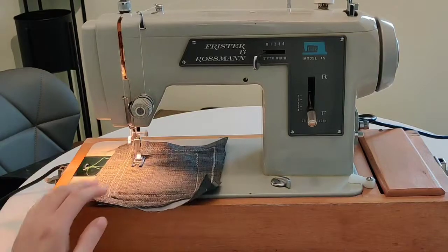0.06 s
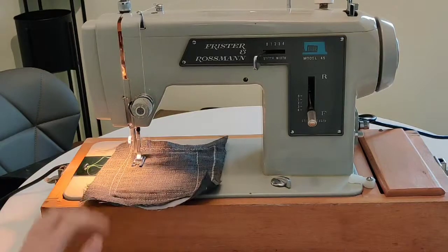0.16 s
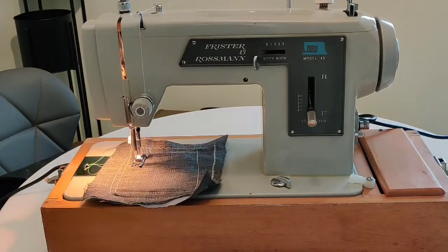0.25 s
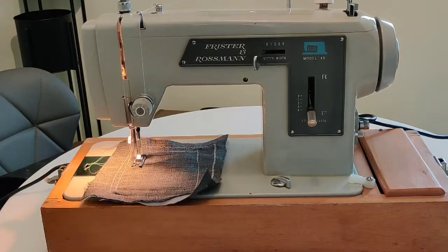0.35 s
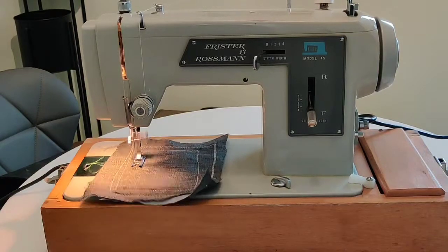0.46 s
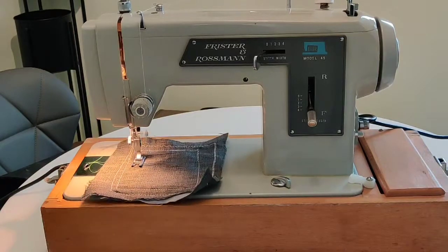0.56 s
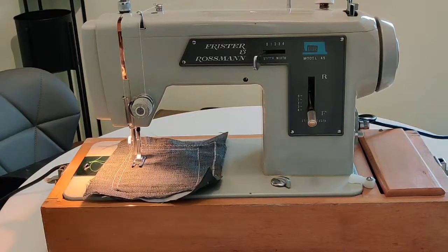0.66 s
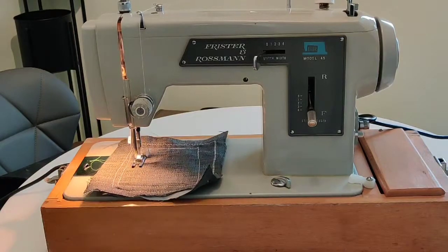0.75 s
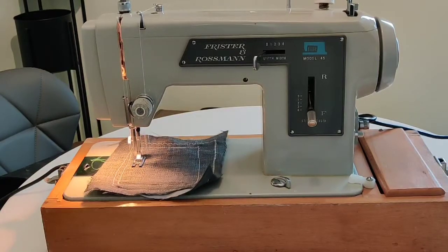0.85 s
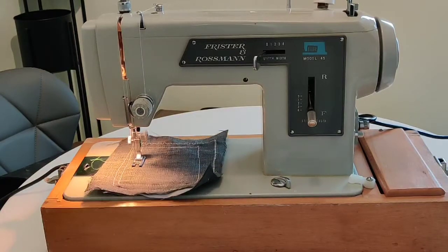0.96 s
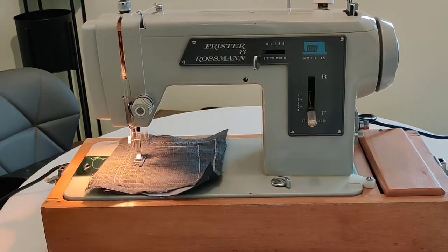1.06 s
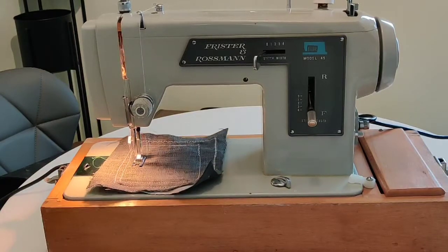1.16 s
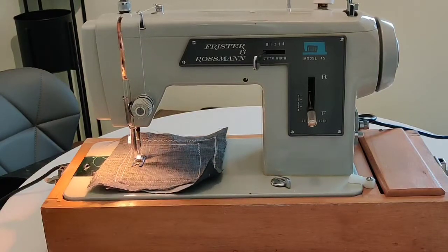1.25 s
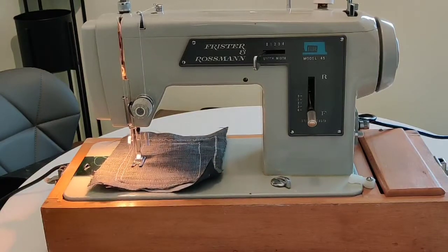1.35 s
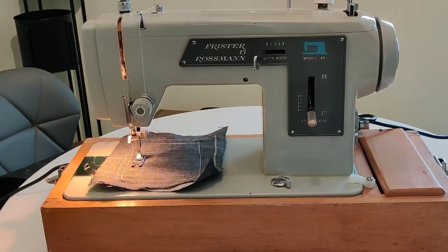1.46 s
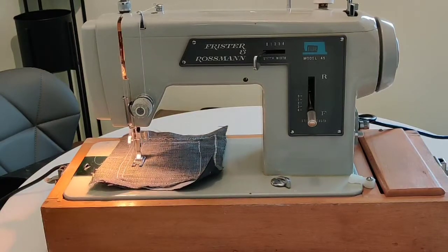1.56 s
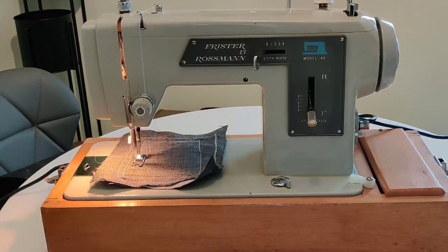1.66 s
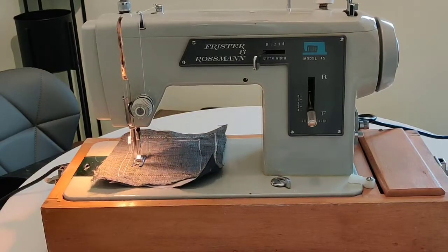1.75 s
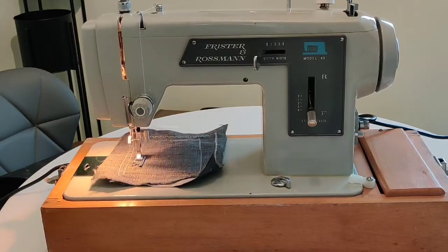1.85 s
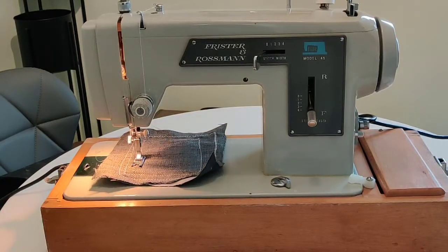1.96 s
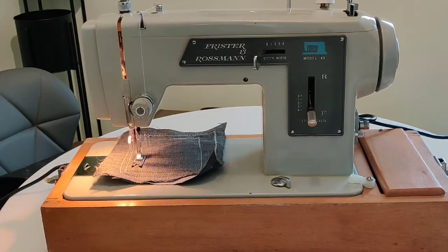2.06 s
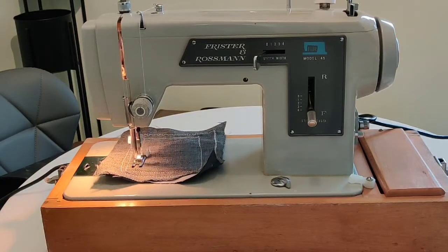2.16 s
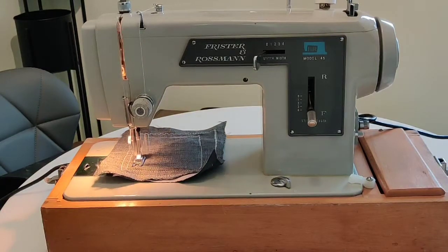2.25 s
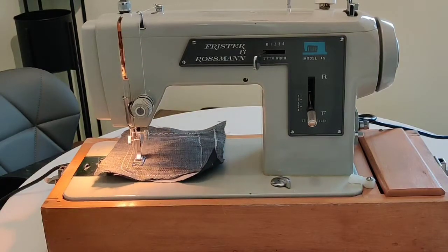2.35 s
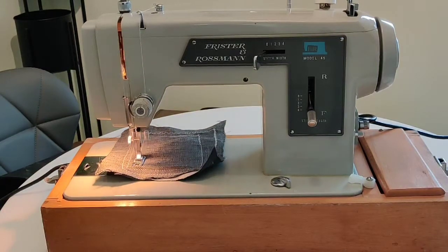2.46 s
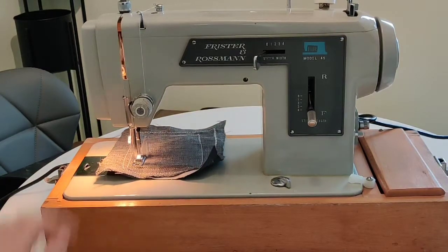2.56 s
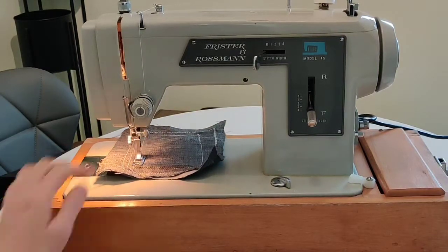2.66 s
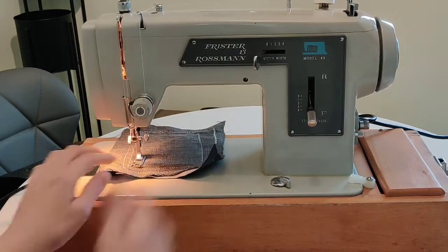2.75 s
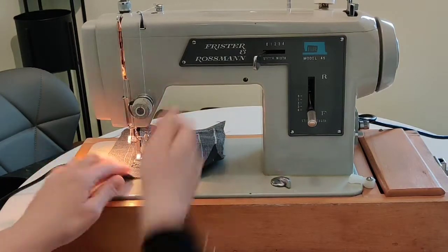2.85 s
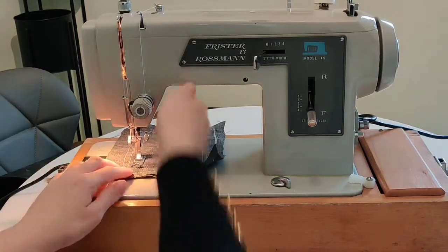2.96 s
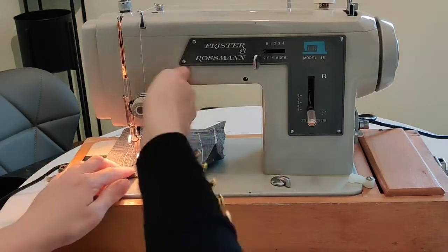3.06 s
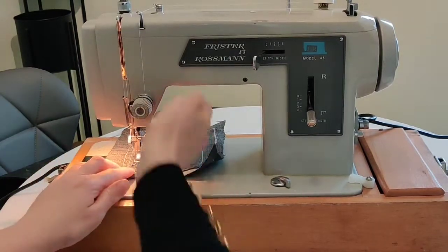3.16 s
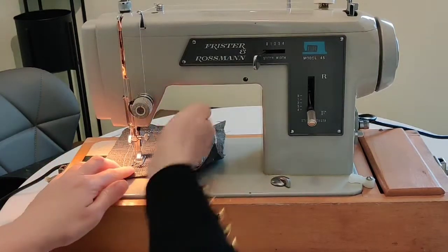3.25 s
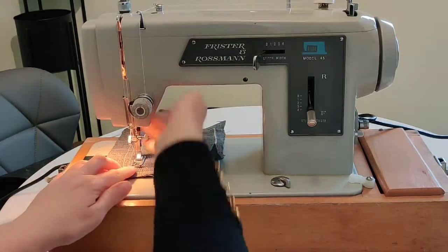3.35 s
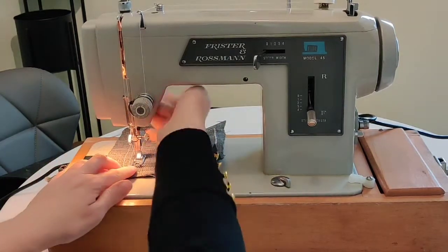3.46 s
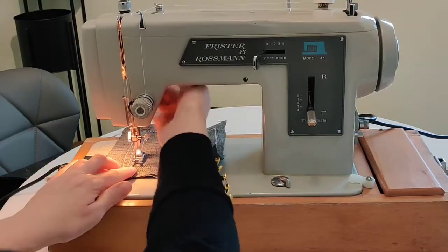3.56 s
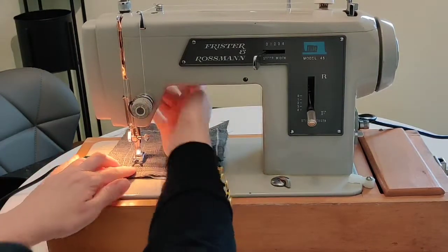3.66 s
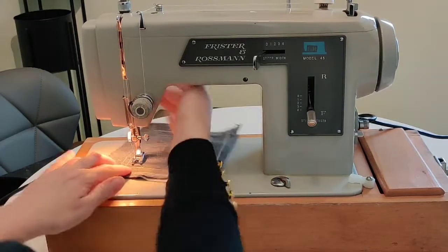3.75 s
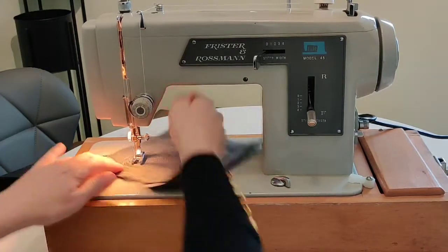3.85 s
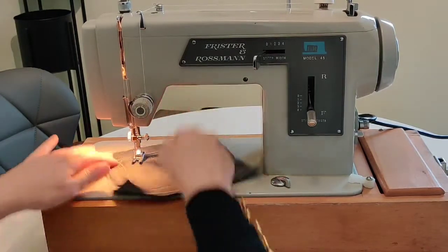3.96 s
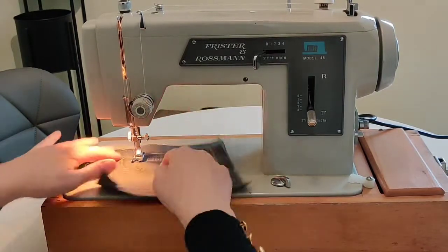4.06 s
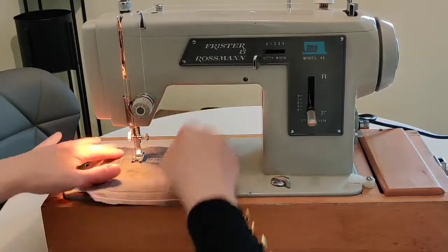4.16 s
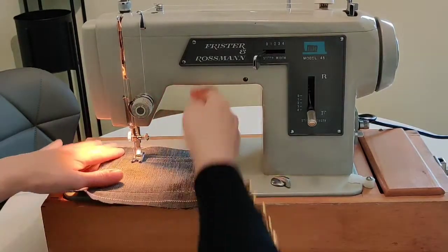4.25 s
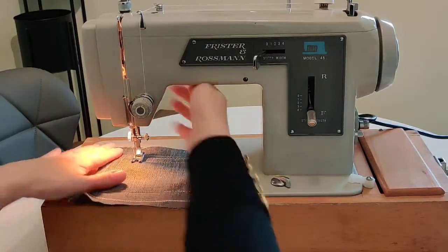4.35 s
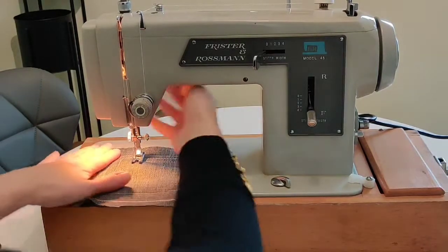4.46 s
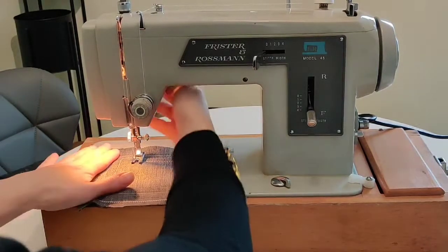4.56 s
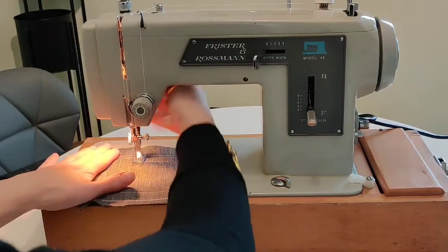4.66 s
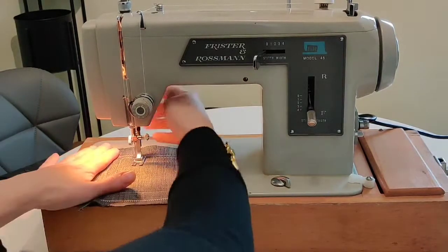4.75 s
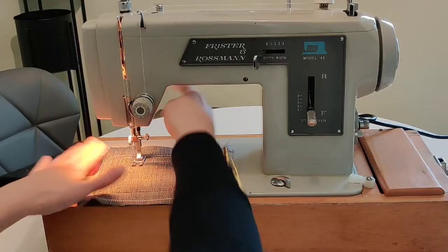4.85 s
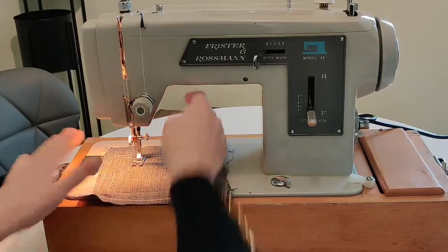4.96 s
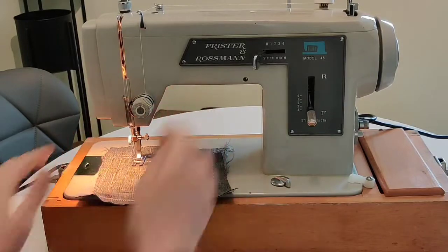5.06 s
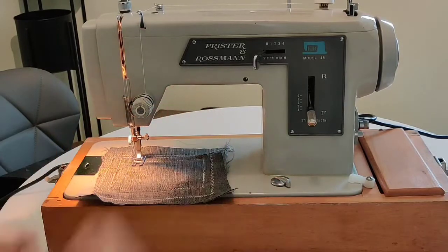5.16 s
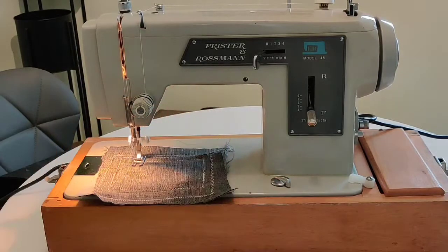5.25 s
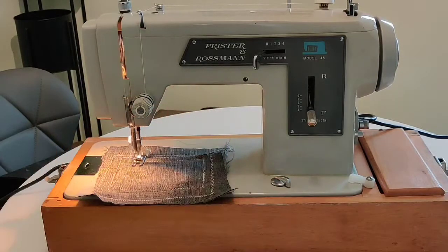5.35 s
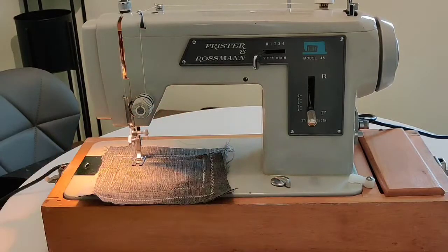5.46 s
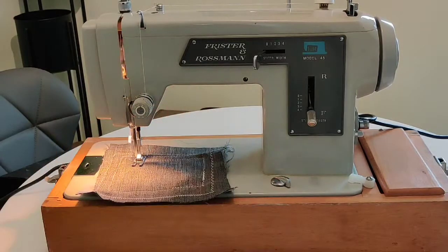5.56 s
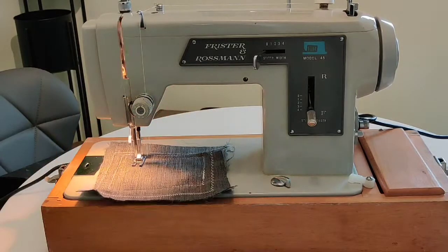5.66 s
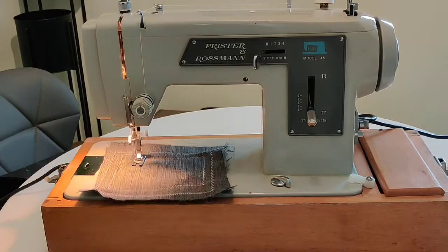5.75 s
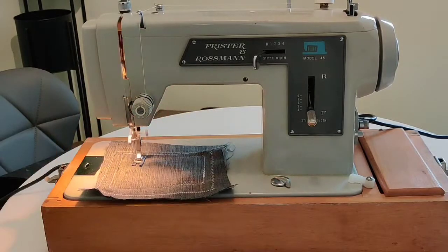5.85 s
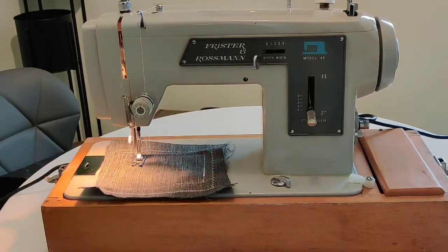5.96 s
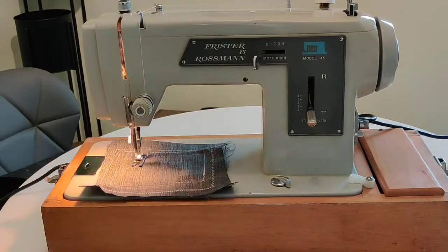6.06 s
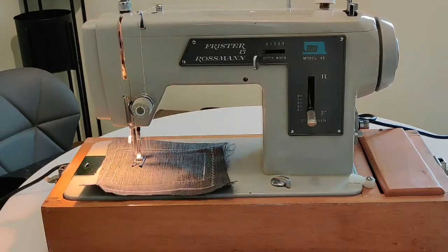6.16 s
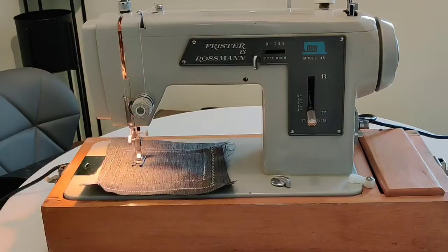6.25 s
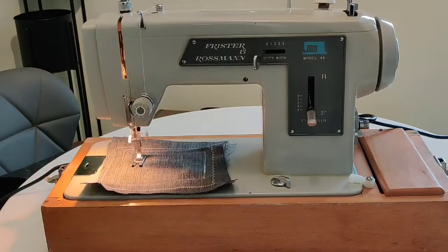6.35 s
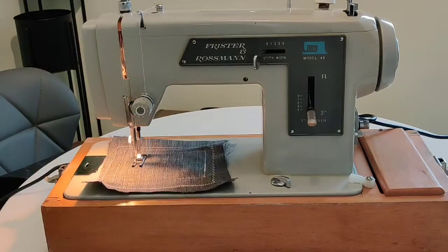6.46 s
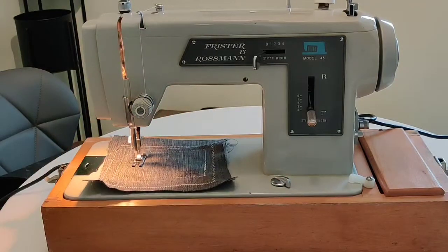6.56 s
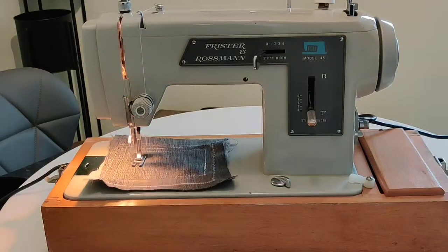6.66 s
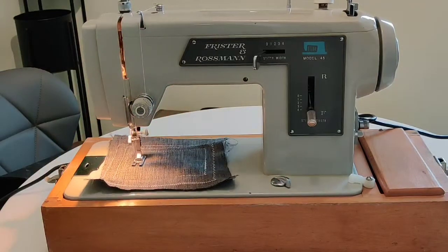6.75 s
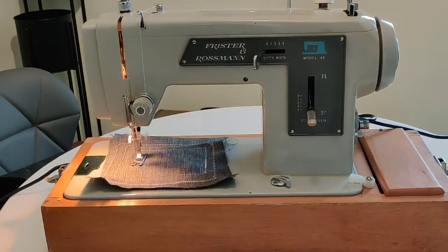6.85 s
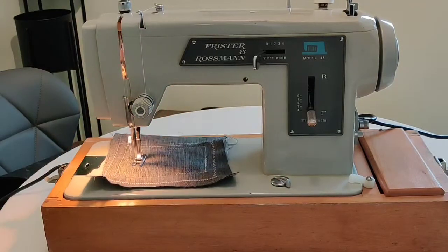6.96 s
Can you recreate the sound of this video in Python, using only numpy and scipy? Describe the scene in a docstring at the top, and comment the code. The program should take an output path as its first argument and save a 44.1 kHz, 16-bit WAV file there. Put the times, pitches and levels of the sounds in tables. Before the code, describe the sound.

An electric sewing machine stitches thick cloth, pauses for metal clacks and fabric handling, then starts up again in a small room.

```python
"""An electric sewing machine on a wooden case stitches thick cloth, eight stitches a second.
Each stitch is a needle knock and a feed rattle over gear clatter and motor hiss. The pedal squeaks
and the machine stops; the presser foot clacks up, hands turn the cloth, the foot is set down,
and the machine gathers speed again. A small room adds a short echo."""
import sys
import numpy as np
from scipy import signal
from scipy.fft import rfft, irfft
from scipy.io import wavfile

SR = 44100
rng = np.random.default_rng(int(sys.argv[2]) if len(sys.argv) > 2 else 0)


def file_out(sig):
    """Save sig as 16-bit WAV at sys.argv[1]."""
    # one column per channel
    cols = np.atleast_2d(sig).T
    # limit, then scale
    lim = np.clip(cols, -1, 1)
    pcm = np.round(lim * 32767).astype(np.int16)
    wavfile.write(sys.argv[1], SR, pcm)


N = 309121
TIME = np.arange(N) / SR
FREQS = np.fft.rfftfreq(N, 1 / SR)
TAIL = TIME[:SR // 2]  # time axis for one hit dying away


# Notes of the bed and wooden case: f/Hz, t60/s (time to fade 60 dB), needle level/dB, feed level/dB
CASE_MODES = [(128.4, 0.17, -18, -34), (182.1, 0.13, -12, -19), (316.7, 0.22, -15, -20.5),
              (350, 0.086, 6, -18), (399, 0.1, -18, -4.5), (458.2, 0.12, 3, 4.5), (475.9, 0.19, -9, -5.5),
              (591, 0.45, -29, -20), (677.6, 0.21, -21, -27), (806, 0.25, -36, -20.5),
              (924, 0.13, -7.5, -13), (1029, 0.042, 0.5, -1.5), (1520, 0.031, 5, -22.5)]
# Tone of the needle's knock: f/Hz, level/dB
KNOCK_TONE = [(100, -58.5), (300, -5), (700, 8), (1300, 8.5), (1900, 2.5), (3000, 0.5), (6000, -45),
              (15000, -55.5)]
# Tone of a bright metal tick, also used by the clacks: f/Hz, level/dB
TICK_TONE = [(1500, -6), (3000, -7.5), (4000, -3), (4900, 10), (5900, -4), (6800, -3.5), (9000, -11),
             (12000, -15.5), (15500, -21)]

def needle(base_db=-29, boom_growth=.6, rattle_s=.0022, rebound_s=.014, crunch_s=.0066):
    """The needle ticks and crunches into the cloth, its bar knocks and slaps back, the case booms."""
    at, accent_db = strokes(0, spread_db=.82, power=.91)
    db = base_db + accent_db
    boom_db = db + 2 + boom_growth * accent_db  # hard blows boom far more than soft ones
    case = ring([(hz, t60, level) for hz, t60, level, _ in CASE_MODES], attack_s=.013)
    boom = through(taps(at - .00259, undb(boom_db)), case)
    knock = crack(KNOCK_TONE)
    slap = sum(strike(t, level, knock, rattle_s) + strike(t + rebound_s, level - 5, knock, rattle_s)
               for t, level in zip(at, db))
    bell_curve = np.exp(-((TAIL - TAIL.mean()) / crunch_s) ** 2)
    piercing = signal.fftconvolve(taps(at + .0026, undb(db)), bell_curve, mode="same")
    crunch = piercing * noise(slope(KNOCK_TONE, FREQS))
    tick = through(taps(at, undb(db - 18.5)), crack(TICK_TONE))
    return tick + undb(-10) * crunch + undb(-8.5) * slap + boom


def feed(base_db=-26.5, scatter_s=.002042):
    """The toothed bar that moves the cloth rattles the case three times a stitch, never twice alike."""
    force = 0
    for part, part_db in [(.435, 0), (.63, -6.5), (.77, -13)]:  # it drops, slides back, lifts
        at, db = strokes(part, spread_db=1.8, power=1.65)
        late = scatter_s * rng.standard_normal(size=64)[:len(at)]
        force = force + chatter(at + late, base_db + part_db + db, length_s=.016, loose=.3)
    return through(force, ring([(hz, t60, db) for hz, t60, _, db in CASE_MODES], attack_s=.0032))


def shuttle(thud_db=-45, hz=188, t60=.19):
    """The shuttle, which carries the lower thread, thuds softly as it reverses twice a stitch."""
    force = 0
    for part in (.26, .62):
        at, db = strokes(part, spread_db=1.8, power=.5)
        force = force + taps(at, undb(thud_db + db))
    return through(force, ring([(hz, t60, 0), (CASE_MODES[3][0], t60, -8)], attack_s=.012))


# Runs of sewing: motor on t/s, first stitch t/s, motor off t/s, top stitch rate f/Hz
RUNS = [(-1, 0.041, 2.72, 8.079), (5.49, 5.602, 7.5, 8.025)]

def strokes(part, spread_db, power, stick_s=.086, spin_up_s=.121, sag_hz_per_s=.07, coast_s=.565):
    """Times and relative levels of a blow that comes once a turn, `part` of a turn after the needle."""
    times = []
    for on, first, off, top_hz in RUNS:
        # the shaft sticks, spins up, slows a little under load and coasts to a stop
        age = np.maximum(TIME - on - stick_s, 0)
        coast = 1 - np.clip((TIME - off) / coast_s, 0, 1) ** 2
        speed = (top_hz - sag_hz_per_s * age) * (1 - np.exp(-age / spin_up_s)) * coast
        turns = np.cumsum(speed) / SR
        turns = turns - np.interp(first, TIME, turns) - part
        times.extend(TIME[1:][np.diff(np.floor(turns)) > 0])
    at = np.array(times)
    effort_db = 20 * np.log10(np.interp(at, TIME, effort()) + 1e-6)
    luck = rng.standard_normal(size=64)[:len(at)]
    return at, power * effort_db + spread_db * luck


def effort(start_db=-14.5, swell_s=.64, release_s=.16):
    """How hard the motor works, 0 to 1: it swells, holds, and fades once the power is cut."""
    out = 0
    for on, _, off, _ in RUNS:
        attack = undb(start_db * np.clip(1 - (TIME - on) / swell_s, 0, 1)) * (TIME > on)
        out = out + attack * np.exp(-(np.maximum(TIME - off, 0) / release_s) ** 2)
    return out


# Tone of a gear click: f/Hz, level/dB
GEAR_TONE = [(25, -4.5), (85, -20.5), (130, 3), (200, 2), (250, 0), (480, 13.5), (700, -4), (1050, 0),
             (1900, -2.5), (2800, -0.5), (3400, -0.5), (4100, -11.5), (6000, -14.5), (7300, -14),
             (11000, -24), (15500, -34)]
# Whining notes of the motor: f/Hz, half-width/Hz, level/dB
MOTOR_WHINE = [(921, 20, -56), (1082, 18, -57.5), (1516, 19, -57.5), (1560, 63, -53.5), (1787, 32, -56),
               (2175, 22, -58.5), (2449, 16, -57.5), (3030, 9, -55.5)]
# Hum of the wooden case at full load: f/Hz, half-width/Hz, level/dB
CASE_HUM = [(33, 14, -63.5), (62.2, 4.4, -66), (451, 10, -51)]

def drive(clicks_per_s=1100, spread_db=4, gears_db=-40):
    """Gears click densely and the motor whines; the case hums as the load gets full."""
    clicks = (rng.random(N) < clicks_per_s / SR) * rng.standard_normal(N)
    clicks *= undb(spread_db * rng.uniform(-.051, 1, N))
    gears = undb(gears_db) * unit(through(clicks, crack(GEAR_TONE)))
    whine, hum = (sum(undb(db) * noise(peak(hz, width)) for hz, width, db in table)
                  for table in (MOTOR_WHINE, CASE_HUM))
    load = effort()
    return load * gears + load ** .87 * whine + load ** 1.8 * hum


# Tone of the motor's brushes, its sliding contacts: f/Hz, level/dB
BRUSH_TONE = [(150, -29.5), (1200, -6.5), (3100, -10.5), (4200, -21.5), (4750, -13.5), (5030, -3.5),
              (5350, -14.5), (5900, -20), (9000, -27.5)]

def brushes(motor_hz=78.55, hiss_db=-46.5, drift_db=2.2, lean_db=4):
    """The brushes sizzle, swelling once a motor turn; each side gets its own hiss, the left louder."""
    angle = 2 * np.pi * motor_hz * TIME + .62 * noise(peak(0, .76))
    flicker_db = noise(peak(31, 36)) + drift_db * noise(peak(4.83, .11))
    bursts = unit(np.exp(.14 * np.cos(angle))) * undb(flicker_db)
    level = undb(hiss_db) * effort() ** 1.44 * bursts
    sides = [room(level * noise(slope(BRUSH_TONE, FREQS)), wet_db=-12, bass_wet_db=-9.5)[ear]
             for ear in range(2)]
    return np.array(sides) * undb([[lean_db], [-lean_db]])


# Tone of a sharp steel click, also used by the snaps: f/Hz, level/dB
STEEL_TONE = [(1000, 7), (3000, 14), (6500, 11.5), (9000, 5.5), (13000, -2.5), (15500, 0)]

def joints(ticks_per_s=110, tick_db=-61, spread_db=3):
    """Slightly loose steel joints add a fine, bright ticking."""
    ticks = (rng.random(N) < ticks_per_s / SR) * undb(tick_db + spread_db * rng.uniform(-1.2, 1, N))
    return through(ticks * effort(), crack(STEEL_TONE))


# Clacks of steel on the iron head: t/s, level/dB, treble level/dB, wood f/Hz, boosted head f/Hz
STEEL_CLACKS = [(2.962, -60, 4.5, 455, 1500), (3.222, -61, -7, 455, 1800), (3.24, -62, -8, 460, 1800),
                (3.254, -46, -30, 523, 900), (3.336, -52, -17, 455, 1500), (3.483, -60, -18, 455, 910),
                (3.707, -30.5, -11, 550, 1300), (3.8162, -30.5, -11.5, 456, 1800),
                (3.9232, -34, -16, 450, 910), (4.306, -59, -24, 445, 1200), (4.727, -57, -14.5, 455, 900),
                (4.907, -46.5, -2.5, 523, 900), (5.293, -59, -4, 446, 1800), (5.537, -46, -7, 467, 1500),
                (5.607, -51, -3, 455, 1500), (5.653, -46, -11, 463, 1500), (5.733, -39, -11, 460, 1050)]
# Notes of the machine's iron head: f/Hz, t60/s, level/dB
HEAD_MODES = [(289, 0.17, -3.5), (586, 0.22, 3), (806, 0.072, -1), (927, 0.11, -3.5), (1049, 0.065, 7.5),
              (1264, 0.073, 5.5), (1440, 0.074, -12), (1526, 0.11, -14), (1793, 0.12, -4), (2166, 0.11, -7),
              (3230, .1, -12), (3805, .1, -5), (4811, .14, -3), (6760, .1, -16)]
# Tone of a clack's body: f/Hz, level/dB
CLACK_TONE = [(100, -8), (280, -13.5), (480, 0.5), (660, 4.5), (880, 1), (1250, 6.5), (1580, 2.5),
              (1900, 3), (2500, -2), (3300, -0.5), (4000, -25), (8000, -47)]

def clacks(spot_db=2.5, boost_db=7, boost_width_hz=300):
    """Steel clacks on the iron head and the case answers: the presser foot (it holds the cloth)
    and its lever, and the mechanism ticking as it stops and starts slowly."""
    body, tick = crack(CLACK_TONE), crack(TICK_TONE)
    out = 0
    spots = rng.standard_normal((len(STEEL_CLACKS), len(HEAD_MODES)))  # each spot rings differently
    for (at, db, treble_db, wood_hz, head_hz), spot in zip(STEEL_CLACKS, spots):
        modes = []
        for (hz, t60, level), luck in zip(HEAD_MODES, spot):
            nearness = np.exp(-((hz - head_hz) / boost_width_hz) ** 2)
            modes.append((hz, t60, level + spot_db * luck + boost_db * nearness))
        iron = undb(-10.5) * ring(modes, attack_s=.000096)
        wood = undb(-8.5) * ring([(wood_hz, .039, 0)], attack_s=.01)
        clack = iron + wood + undb(-7) * body + undb(treble_db - 1) * tick
        out = out + strike(at, db, clack, rebound_s=.00258)
    return out


# Snaps of steel parts: t/s, level/dB, ring f/Hz, click level/dB, mount level/dB, mount f/Hz
STEEL_SNAPS = [(4.8995, -41.5, 3300, -12, -13, 510), (4.9035, -44.5, 5120, -12, 0, 686),
               (5.1043, -27, 4630, -13, -8.5, 490), (5.343, -33.5, 3090, -20, -12, 1640),
               (5.4819, -27.5, 5040, -13, -5, 810)]

def snaps(spacing=.028, steel_t60=.017, mount_t60=.012):
    """Small steel parts click, ring briefly on five close notes and knock on their mount."""
    out = 0
    for at, db, hz, click_db, mount_db, mount_hz in STEEL_SNAPS:
        notes = ring([(hz * (1 + k * spacing), steel_t60, -.3 * k) for k in range(5)], attack_s=.0012)
        steel = undb(-12) * notes + undb(click_db) * crack(STEEL_TONE)
        mount = ring([(mount_hz, mount_t60, 0)], attack_s=.0029) + undb(-5) * crack(CLACK_TONE)
        out = out + strike(at, db, steel + undb(mount_db - 13) * mount, rebound_s=.0017)
    return out


# Squeaks of the pedal: middle t/s, length/s, level/dB, favoured f/Hz
SQUEAKS = [(2.815, 0.06, -41, 6840), (5.402, 0.1, -49.5, 4950)]
# Notes of the pedal's hinge: f/Hz, width/Hz, level/dB
HINGE_NOTES = [(1700, 150, 4.5), (3120, 720, -2), (5100, 710, -2), (6630, 170, -5.5), (8260, 350, -16)]
# Tone of the hinge rubbing: f/Hz, level/dB
RUB_TONE = [(300, 2), (1000, 6.5), (4000, -4), (8000, -4), (15500, -10)]

def pedal(rub_db=-8, slip_db=3, slip_hz=120):
    """The pedal's hinge sticks and slips: a broad rub that makes the hinge sing."""
    hinge = sum(undb(db) * peak(hz, width / 2) for hz, width, db in HINGE_NOTES)
    slips = undb(slip_db * noise(peak(0, slip_hz)))
    out = 0
    for at, length, db, hz in SQUEAKS:
        squeak = noise(hinge * np.sqrt(peak(hz, 1100)))
        rub = undb(rub_db) * noise(slope(RUB_TONE, FREQS))
        out = out + undb(db) * swell(at, length) * (squeak + rub)
    return out * slips


# Bumps of hands on the machine's flat bed: t/s, level/dB, f/Hz
HAND_BUMPS = [(3.083, -63, 129), (3.252, -56.5, 198), (3.402, -59, 213), (3.422, -59.5, 138),
              (3.51, -63, 124), (3.691, -55.5, 160), (4.086, -66, 143), (4.776, -68.5, 153),
              (4.928, -47.5, 177), (4.945, -48, 184)]
# Tone of skin slapping cloth: f/Hz, level/dB
SKIN_TONE = [(70, -32), (170, 0), (450, -2), (1000, -10.5), (3000, -35)]

def hands(thud_db=8.5, slap_db=1, t60=.059):
    """Soft hands wake only the low notes of the case, with a dull slap."""
    case = [(CASE_MODES[row][0], t60, db) for row, db in [(2, -11), (3, -14), (5, -13)]]
    slap = undb(slap_db) * crack(SKIN_TONE)
    out = 0
    for at, db, hz in HAND_BUMPS:
        thud = undb(thud_db) * ring([(hz, t60, 0)] + case, attack_s=.0053)
        out = out + strike(at, db, thud + slap, rebound_s=.0045)
    return out


# Pushes of the cloth: middle t/s, length/s, level/dB
CLOTH_PUSHES = [(2.947, 0.12, -51), (3.27, 0.059, -52.5), (3.504, 0.081, -63.5), (3.68, 0.17, -66),
                (3.936, 0.23, -60.5), (4.334, 0.19, -65.5), (4.752, 0.062, -70), (5.088, 0.35, -64.5)]
# Tone of sliding cloth: f/Hz, level/dB
CLOTH_TONE = [(60, 3), (170, 10), (420, 8.5), (700, 2), (1400, -10), (2500, -19), (6000, -26), (15000, -52)]

def cloth(grip_db=3, catch_hz=21):
    """Cloth and sleeve drag over the bed in small catches."""
    motion = sum(undb(db) * swell(at, length) for at, length, db in CLOTH_PUSHES)
    return noise(slope(CLOTH_TONE, FREQS)) * motion * undb(grip_db * noise(peak(0, catch_hz)))


# Tone of the still room: f/Hz, level/dB
AIR_TONE = [(15, -22.5), (25, 1.5), (71, -11), (122, -21), (240, -17), (297, -12), (804, -27), (919, -27),
            (4040, -35), (5010, -32), (6380, -40.5), (10600, -35), (15500, -37)]

def room_air(air_db=-75, hum_db=-79, hum_hz=118):
    """Still room air with a faint mains hum."""
    tone = slope(AIR_TONE, FREQS)
    shared = noise(tone)
    side = undb(-4) * noise(tone * np.minimum(FREQS / 900, 1))
    hum = undb(hum_db) * np.sqrt(2) * np.sin(2 * np.pi * hum_hz * TIME)
    return undb(air_db) * np.array([shared + side, shared - side]) + hum


def room(x, wet_db, bass_wet_db, top_wet_db=1, low_t60=.31, high_t60=.22):
    """Direct sound plus the walls' echo ("wet") at two close microphones, which share the bass."""
    hz = np.fft.rfftfreq(len(TAIL), 1 / SR)
    treble = np.clip(hz / 8000, 0, 1)
    echoes = rng.standard_normal((2, len(TAIL))) * np.clip(TAIL / .0006 - .5, 0, 1)
    low, high = (echoes * undb(-60 * TAIL / t60) * np.sqrt(2 * np.log(1000) / (t60 * SR))
                 for t60 in (low_t60, high_t60))
    shared, side = rfft(low) * (1 - treble) + rfft(high) * treble
    alike = 1 / (1 + (hz / 750) ** 2)
    shared *= np.sqrt((1 + alike) / 2)
    side *= np.sqrt((1 - alike) / 2)
    wet = slope([(450, bass_wet_db), (1200, wet_db), (9000, wet_db), (14000, top_wet_db)], hz)
    ears = [(1 + wet * echo) / np.sqrt(1 + wet ** 2) for echo in (shared + side, shared - side)]
    return np.array([through(x, irfft(ear, len(TAIL))[:-SR // 10]) for ear in ears])


def undb(db):
    """Turn decibels into a gain to multiply by."""
    return 10 ** (np.asarray(db) / 20)


def unit(x):
    """Scale to an average strength (rms) of 1."""
    return x / np.sqrt(np.mean(x ** 2))


def blow(x):
    """Scale to the energy of 10 ms at rms 1."""
    return x / np.sqrt(np.sum(x ** 2) / (.01 * SR))


def slope(points, hz):
    """Gain at hz along a line through (f/Hz, level/dB) points, on a log frequency axis."""
    f, db = np.transpose(points)
    return undb(np.interp(np.log(hz + 1), np.log(f), db))


def peak(hz, half_width):
    """A hill of gain around one frequency."""
    return 1 / (1 + ((FREQS - hz) / half_width) ** 2)


def noise(gain):
    """Noise of rms 1, shaped by a gain for each frequency."""
    return unit(irfft(rfft(rng.standard_normal(N)) * gain, N))


def swell(middle_s, length_s):
    """The smooth rise and fall of one movement."""
    return np.exp(-(2 * (TIME - middle_s) / length_s) ** 2)


def crack(points):
    """The shortest click with this tone, its energy packed at the start."""
    size = len(TAIL)
    cepstrum = irfft(np.log(slope(points, np.fft.rfftfreq(size, 1 / SR))), size)
    cepstrum[1:size // 2] *= 2
    cepstrum[size // 2 + 1:] = 0
    return blow(irfft(np.exp(rfft(cepstrum)), size))


def ring(modes, attack_s):
    """A struck body's fading notes (f/Hz, t60/s, level/dB); the blow takes attack_s to spread."""
    rise = 1 - np.exp(-TAIL / attack_s)
    notes = sum(undb(db - 60 * TAIL / t60) * np.sin(2 * np.pi * hz * TAIL) for hz, t60, db in modes)
    return blow(rise * notes)


def through(x, response):
    """Pass x through a body or a room."""
    return signal.fftconvolve(x, response)[:len(x)]


def taps(times, sizes):
    """One-sample spikes at the given times."""
    at = np.round(np.ravel(times) * SR).astype(int)
    inside = (at >= 0) & (at < N)
    return np.bincount(at[inside], np.ravel(sizes)[inside], N)


def chatter(times, db, length_s, loose):
    """Hard hits, each followed by a dying buzz of tiny bounces."""
    buzz = np.exp(-TAIL / length_s) * np.sqrt(2 / (length_s * SR))
    spread = np.sqrt(np.abs(through(taps(times, undb(db) ** 2), buzz ** 2)))
    return taps(times, undb(db)) + loose * spread * rng.standard_normal(N)


def strike(at, db, response, rebound_s):
    """One hit, spread over quick bounces that keep the tone of the struck part."""
    age = TAIL[:SR // 10]
    force = rng.standard_normal(len(age)) * np.exp(-age / rebound_s)
    for _ in range(3):  # make all frequencies equally strong, then shorten again
        flat = irfft(np.exp(1j * np.angle(rfft(force))), len(age))
        force = flat * np.exp(-age / (10 * rebound_s))
    sound = undb(db) * through(response, force / np.linalg.norm(force))
    return np.pad(sound, (max(round(at * SR), 0), N))[:N]


def scene():
    """Machine, hands and pedal in the small room."""
    machine = room(needle() + feed() + shuttle() + drive() + joints(), wet_db=-1.5, bass_wet_db=-9)
    handling = room(clacks() + snaps() + hands() + cloth() + pedal(), wet_db=11, bass_wet_db=-2)
    return machine + brushes() + handling + room_air()


# How much louder the left side is than the right: f/Hz, level/dB
BALANCE = [(60, 5), (500, 4.5), (1200, 3), (3000, 2), (4200, 5.5), (5500, 6), (6300, -7.5), (8000, -0.5),
           (15000, -4.5)]

def record(dry, left_lag_s=.00009, top_hz=15900):
    """The left microphone hears later and, below the high treble, louder; the very top is cut."""
    lean = np.sqrt(slope(BALANCE, FREQS))
    delay = np.exp(-2j * np.pi * FREQS * left_lag_s)
    heard = irfft(rfft(dry) * np.array([lean * delay, 1 / lean]), N)
    return signal.sosfilt(signal.ellip(10, .2, 70, top_hz, fs=SR, output="sos"), heard)


dry = scene()
out = record(dry)
file_out(out)
```